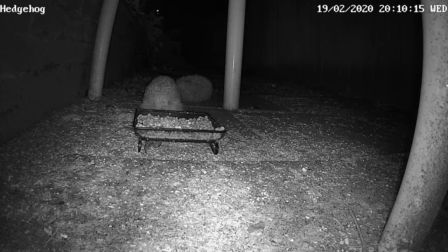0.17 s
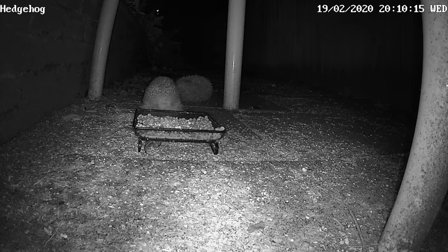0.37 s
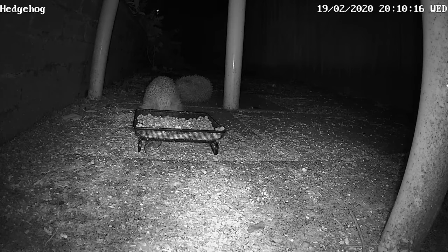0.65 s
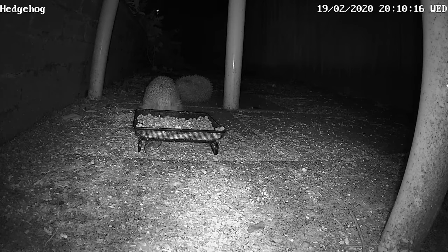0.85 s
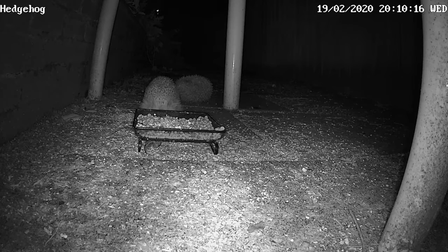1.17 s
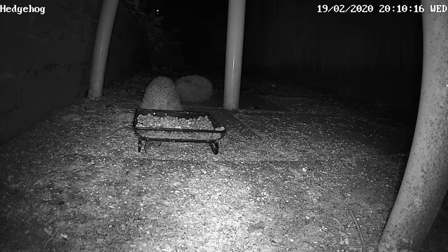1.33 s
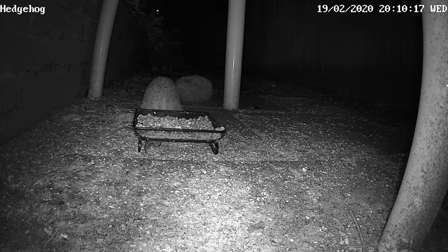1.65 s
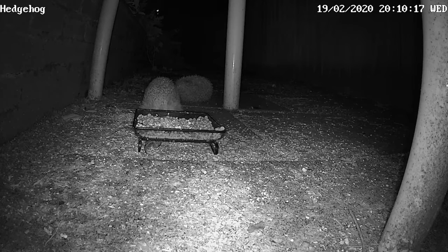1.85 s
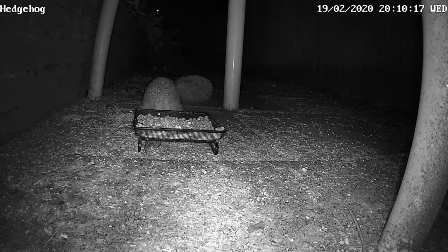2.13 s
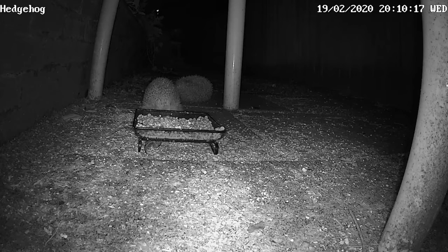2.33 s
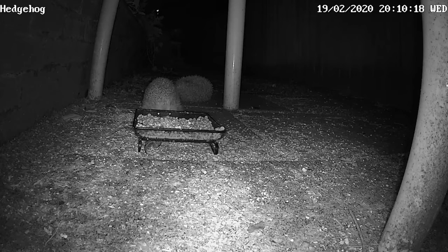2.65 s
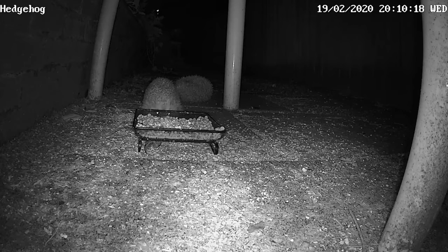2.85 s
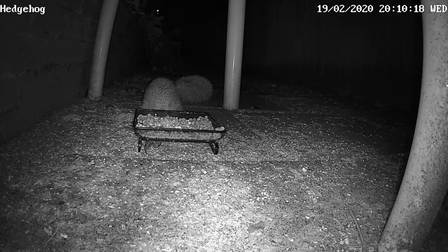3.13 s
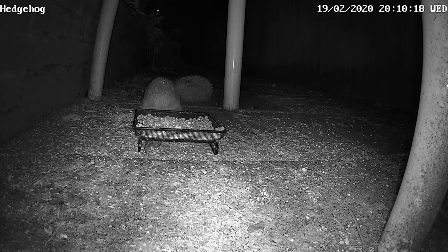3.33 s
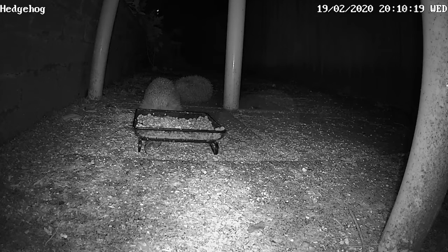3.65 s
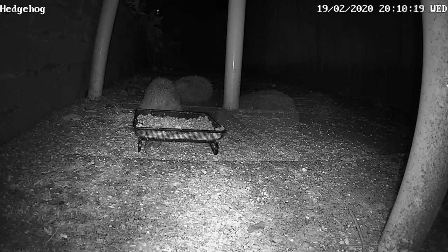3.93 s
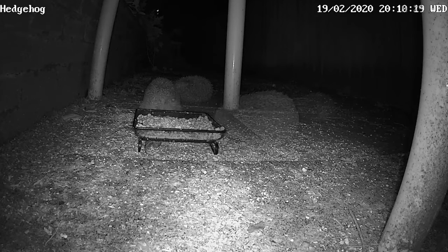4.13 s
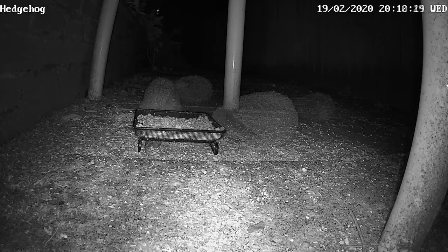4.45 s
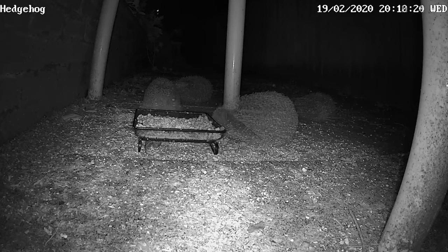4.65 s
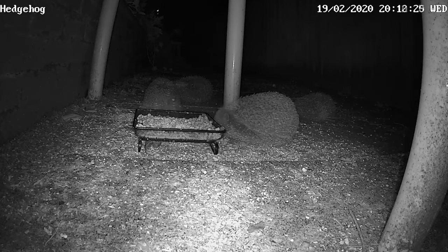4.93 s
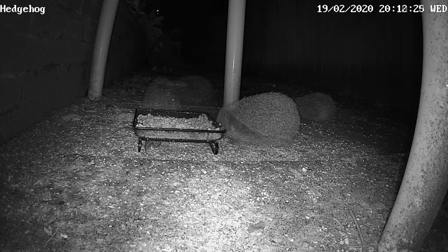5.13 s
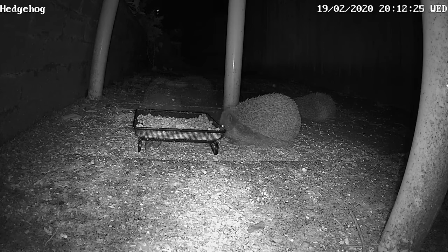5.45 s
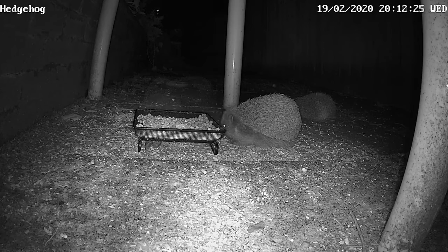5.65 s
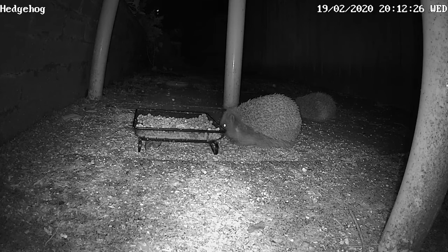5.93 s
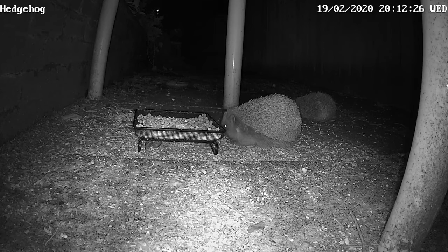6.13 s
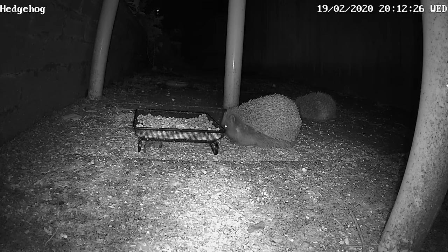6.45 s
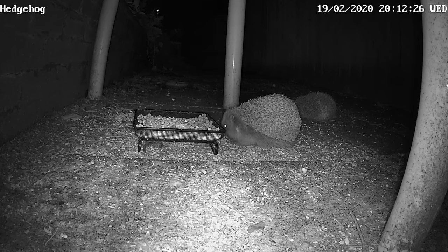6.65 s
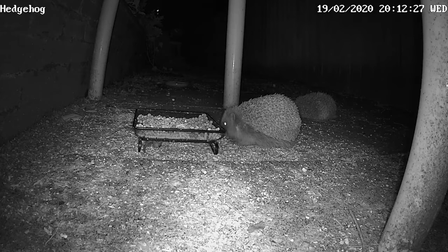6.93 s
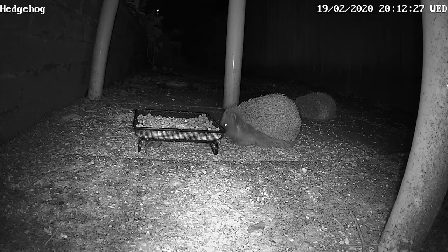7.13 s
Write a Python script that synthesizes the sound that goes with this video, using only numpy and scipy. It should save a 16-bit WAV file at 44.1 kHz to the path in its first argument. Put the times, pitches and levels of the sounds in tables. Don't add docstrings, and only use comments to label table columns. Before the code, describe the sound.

A low, muffled bed of distant road noise and engine hum runs throughout. Over it, small animals snap dry pellets, with faint gritty grinding and a hollow tray knock, echoing briefly off close walls. The first half is sparse; after a gradual blend the chewing becomes dense and quick while soft gusts bump the microphone. Cheap camera sound, lo-fi and slightly watery in the highs.

```python
import sys
import numpy as np
from scipy import signal
from scipy.fft import rfft, irfft, next_fast_len
from scipy.io import wavfile
from scipy.ndimage import uniform_filter1d

SR = 44100
rng = np.random.default_rng(int(sys.argv[2]) if len(sys.argv) > 2 else 0)


def magnitude_from_level(level_db):
    exponent = np.asarray(level_db, float) / 20
    return 10 ** exponent


def inscribe(sig):
    pcm = np.round(np.clip(np.atleast_2d(sig).T, -1, 1) * 32767)
    wavfile.write(sys.argv[1], SR, pcm.astype(np.int16))


N = 321076

# f/Hz, density/dB
WIND_COLOUR = [(5, -3), (12, 1.5), (24, -1), (36, -5), (60, -16.5), (200, -67)]
# f/Hz, density/dB
HISS_COLOUR = [(60, 3.5), (110, -1.5), (200, -5), (335, -12.5), (840, -15.5), (950, -15), (1150, -17.5),
               (1500, -25.5), (2000, -34.5), (2600, -43.5), (3300, -52.5), (8000, -70.5)]
# f/Hz, density/dB
RUMBLE_COLOUR = [(20, -16), (40, -10), (70, 10.5), (100, 4.5), (140, -4.5), (250, -39)]
# t/s, level/dB
WIND_LEVEL = [(0.0, -55), (0.47, -64), (4.24, -64), (4.48, -54.5), (4.7, -59), (5.33, -53), (7.28, -51.5)]
# t/s, level/dB
ENGINE_LEVEL = [(0.0, -70.5), (0.12, -54), (0.38, -48.5), (0.4, -64), (0.67, -49), (2.72, -54), (2.76, -50),
                (4.28, -51.5), (4.34, -46), (5.07, -58.5), (5.09, -51.5), (6.18, -55), (6.26, -38.5),
                (6.39, -56.5), (6.87, -45.5), (7.02, -55), (7.06, -41), (7.28, -60.5)]
# t/s, peak/dB
THUMPS = [(4.366, -31), (4.691, -41.5), (5.208, -39), (5.329, -33.5), (5.779, -36), (5.815, -36),
          (5.849, -38), (6.191, -33.5), (6.251, -25), (6.338, -36.5), (6.769, -39.5), (7.056, -35.5)]
# start/s, end/s, level/dB
GRINDING_BOUTS = [(0.046, 0.162, -90.5), (0.37, 0.494, -87.5), (0.563, .98, -88.5), (1.11, 1.172, -91.5),
                  (1.4, 1.596, -92), (1.826, 1.883, -88.5), (1.962, 2.089, -92), (2.405, 2.839, -87.5),
                  (3.73, 3.86, -90.5), (4.0, 4.42, -91), (4.607, 4.701, -83), (4.72, 5.026, -88.5),
                  (5.04, 5.269, -91.5), (5.4, 5.578, -90), (5.878, 6.016, -84), (6.169, 6.209, -87),
                  (6.27, 6.331, -79), (6.364, 6.56, -83)]
# f/Hz, width/Hz, level/dB
CRUMB_MODES = [(2794, 1000, 2.5), (3800, 350, -2.5), (4673, 1900, -10.5), (6400, 330, -12)]
# t/s, peak/dB, jaw f/Hz
NIBBLES = [(0.127, -78, 3120), (0.5562, -75.5, 3220), (1.1307, -72.5, 3270), (1.41, -80, 3120),
           (2.316, -81, 3830), (2.342, -69.5, 4020), (2.5424, -71, 3740), (4.0148, -61, 3350),
           (4.0312, -65.5, 3430), (4.0428, -64, 3320), (4.0993, -72, 3800), (4.105, -73.5, 3910),
           (4.203, -64.5, 3720), (4.2305, -61.5, 3658), (4.4179, -72, 3940), (4.698, -86, 3300),
           (4.731, -75, 3900), (4.846, -64, 3600), (5.076, -73, 4280), (5.119, -75, 3630),
           (5.1404, -73, 3400), (5.886, -55, 3700), (6.1567, -62, 3410), (6.1703, -61, 3640),
           (6.207, -57, 3610), (6.533, -61, 3610), (6.6111, -61.5, 3720), (6.625, -56, 3910),
           (6.938, -65, 3730), (7.199, -65, 3530)]
# t/s, peak/dB, tray thud/dB rel, bright snap/dB rel, jaw f/Hz
BREAKS = [(0.3379, -50, -1.5, -27, 3850), (0.7087, -47.5, -13.5, -24, 4100), (0.846, -48.5, 1, -24, 3700),
          (1.3581, -37, -7, -15.5, 4070), (1.654, -42, 9, 5.5, 5100), (2.7293, -53.5, 1, -14, 3930),
          (3.0993, -32, -5, 8.5, 4110), (3.1129, -35, -8.5, -14, 5050), (3.268, -44, -4.5, 5, 3820),
          (3.2971, -39, -10, -17, 3890), (3.7232, -43.5, -16, -8, 3730), (4.4928, -45, -22, 0, 3860),
          (4.571, -42, 6, -28, 4160), (4.61, -36, -3, -2.5, 4020), (4.801, -45, -23, 3, 3980),
          (4.8304, -44.5, -28, -6, 3880), (5.4663, -49.5, -28, -9, 4290), (5.6707, -32.5, -1, -9.5, 4330),
          (5.737, -39, 2.5, -10.5, 4390), (5.918, -46, 3.5, -24, 4110), (6.2672, -39.5, -0.5, -6, 4060),
          (6.3943, -38, -5.5, -13, 4060), (6.6367, -42, -22.5, -14, 3920), (6.9137, -45, -20.5, -29, 3490)]
# t/s, peak/dB, bright snap/dB rel, jaw f/Hz
CHEWS = [(0.656, -54.5, -8, 3720), (0.83, -54, -35, 4030), (1.5377, -53.5, -10, 4320),
         (2.0098, -56, -22, 4060), (2.7561, -51.5, -11, 3750), (3.254, -48.5, -30, 3970),
         (3.691, -55.5, -6.5, 3970), (3.7049, -48.5, -20, 3660), (4.4532, -55, -8.5, 3830),
         (4.5796, -44, -8, 4100), (4.779, -51, -15, 3700), (4.877, -49, -23, 3520),
         (5.0853, -58, -0.5, 3770), (5.107, -51.5, -2.5, 4000), (5.1895, -54.5, 0, 3760),
         (5.4107, -63, -15, 3840), (5.683, -41, -7, 3130), (5.9373, -46, -11, 3630),
         (5.9616, -39.5, -17, 3700), (5.9688, -43.5, -20, 3690), (6.011, -49.5, -24, 3300),
         (6.1867, -43.5, -28, 3410), (6.3784, -55, -4, 4660), (6.4452, -46, -15, 4060),
         (6.4624, -48, -15, 4490), (6.6575, -43.5, -18, 3640), (5.515, -70, -18, 4070),
         (5.555, -62, -20, 3553)]
# f/Hz, width/Hz, level/dB
TRAY_MODES = [(944, 190, -2), (1294, 230, 0), (2600, 1700, 1.5)]
# f/Hz, width/Hz, level/dB
SNAP_MODES = [(5890, 1300, 0.5), (7460, 2200, 2), (7300, 1100, -13)]
# delay t/s, level/dB
ECHOES = [(.0032, -12), (.0075, -16.5), (0.012, -14), (.019, -23.5)]
ATTACKS_S = [1.357, 1.653, 3.09, 3.11, 4.452, 4.492, 4.571, 4.61, 5.40, 5.466, 5.67, 6.266, 6.393]

DISSOLVE_S = (4, 5.2)
HUM_HZ = (48.5, 60.3)
RUMBLE_DB, HISS_DB = (-59.5, -59.5), (-55, -55.5)
GATE_DB = (-80.5, -75)
FRAME_GRID = (964, 835)

CAMERA_SR, FRAME, BRIEF = 16000, 1024, 128
FRAME_BANDS = np.r_[0:88:8, 88:196:12, np.geomspace(196, FRAME, 24).round()].astype(int)
BRIEF_BANDS = np.r_[0:32:4, 32, 40, 48, 60, 72, 88, 104, 116, 128]


def level_over_time(rows):
    s, level_db = np.transpose(rows)
    return np.interp(np.arange(N) / SR, s, level_db)


def rms_one(x):
    return x / np.sqrt(np.mean(x ** 2) + 1e-20)


def coloured(spectrum):
    size = next_fast_len(N)
    hz, level_db = np.transpose(spectrum)
    bins_hz = np.arange(size // 2 + 1) * SR / size
    shape = magnitude_from_level(np.interp(np.log(bins_hz + 1), np.log(hz), level_db))
    return rms_one(irfft(rfft(rng.standard_normal(size)) * shape, size)[:N])


def resonate(x, hz, width_hz):
    r, w = np.exp(-np.pi * width_hz / SR), 2 * np.pi * hz / SR
    return signal.lfilter([0, np.sin(w)], [1, -2 * r * np.cos(w), r * r], x)


def body(x, modes):
    return sum((-1) ** k * magnitude_from_level(db) * resonate(x, hz, width) for k, (hz, width, db) in enumerate(modes))


def later_share():
    return np.interp(np.arange(N) / SR, DISSOLVE_S, [0, 1])


def dissolve_dip_db():
    return -1.5 * np.sin(np.pi * later_share())


def engine(wander_hz=1.2):
    share = later_share()
    wander = np.cumsum(wander_hz * coloured([(.1, 0), (3, 0), (30, -40)])) / SR
    turns = np.outer(HUM_HZ, np.arange(N) / SR) + wander
    early, late = np.sqrt(2) * np.sin(2 * np.pi * turns)
    return magnitude_from_level(level_over_time(ENGINE_LEVEL) - 0.5) * ((1 - share) * early + share * magnitude_from_level(-1.5) * late)


def traffic(swell_db=1.5, rumble_rise_db_per_s=3, hiss_rise_db_per_s=1.75):
    share, dip_db = later_share(), dissolve_dip_db()
    nearing_s = np.clip(np.arange(N) / SR - DISSOLVE_S[1], 0, 1.4)
    swell = swell_db * coloured([(.1, 0), (3, 0), (300, -120)])
    rumble_db = np.interp(share, [0, 1], RUMBLE_DB) + dip_db + swell + rumble_rise_db_per_s * nearing_s
    hiss_db = np.interp(share, [0, 1], HISS_DB) + dip_db + hiss_rise_db_per_s * nearing_s
    return magnitude_from_level(rumble_db) * coloured(RUMBLE_COLOUR) + magnitude_from_level(hiss_db) * coloured(HISS_COLOUR)


def wind():
    return magnitude_from_level(level_over_time(WIND_LEVEL) + 3.5) * coloured(WIND_COLOUR)


def thumps(swing_hz=31.7, turns=.65, gain_db=-1.0):
    out, t = np.zeros(N + SR), np.arange(SR // 4) / SR
    age = t * swing_hz / turns
    swing = np.e * age * np.exp(-2 * age) * 2 * np.sin(2 * np.pi * swing_hz * t)
    for s, peak_db in THUMPS:
        at = round(s * SR)
        out[at:at + len(t)] += magnitude_from_level(peak_db + gain_db) * swing
    return out[:N]


def grinding(clicks_per_s=1500, fade_db_per_s=500, gain_db=-0.5):
    sizes = magnitude_from_level(3.5 * np.minimum(rng.exponential(1, N), 4)) * rng.choice([-1, 1], N)
    clicks = sizes * (rng.random(N) < clicks_per_s / SR)
    t = np.arange(N) / SR
    effort = np.zeros(N)
    for start, end, level_db in GRINDING_BOUTS:
        outside_s = np.maximum(0, np.maximum(start - t, t - end))
        effort += magnitude_from_level(level_db - fade_db_per_s * outside_s)
    return effort * magnitude_from_level(gain_db) * rms_one(body(clicks, CRUMB_MODES))


def nibbles(width_hz=1000, length_s=0.0072, gain_db=-2.5, echo_s=0.003, echo_db=-3.0):
    out, t = np.zeros(N + SR), np.arange(SR // 10) / SR
    age = t / length_s
    for s, peak_db, jaw_hz in NIBBLES:
        rasp = rng.standard_normal(len(t))
        for _ in range(2):
            rasp = resonate(rasp, jaw_hz, width_hz)
        rasp = rms_one(rasp) * np.sqrt(age) * np.exp(-age)
        rasp = rasp + magnitude_from_level(echo_db) * np.roll(rasp, round(echo_s * SR))
        at = round(s * SR)
        out[at:at + len(t)] += magnitude_from_level(peak_db + gain_db) * rasp
    return out[:N]


def crack_force(t, t60_s, splinter_db=-11, tail_db=-26):
    draw, scatter = rng.random(len(t)), rng.standard_normal((2, len(t)))
    force = magnitude_from_level(splinter_db) * scatter[0] * (draw < 900 / SR) * np.exp(-t / 0.0066)
    force[0] = 1
    force = force + sum(magnitude_from_level(db) * np.roll(force, round(lag * SR)) for lag, db in ECHOES)
    tail = scatter[1] * magnitude_from_level(-60 * t / t60_s) * (1 - np.exp(-t / 0.0024))
    return force + magnitude_from_level(tail_db) * tail


def cracks(break_t60_s=0.082, chew_t60_s=0.099, chew_thud_db=-5.5, jaw_width_hz=520, thud_db=-3, gain_db=-2):
    out, t = np.zeros(N + SR), np.arange(SR // 5) / SR
    breaks = [(*row, break_t60_s) for row in BREAKS]
    chews = [(s, db, chew_thud_db, snap, hz, chew_t60_s) for s, db, snap, hz in CHEWS]
    for s, peak_db, tray_db, snap_db, jaw_hz, t60_s in breaks + chews:
        force = crack_force(t, t60_s)
        sound = resonate(force, jaw_hz, jaw_width_hz)
        sound += magnitude_from_level(snap_db) * body(force, SNAP_MODES)
        sound += magnitude_from_level(tray_db + thud_db) * body(force, TRAY_MODES)
        at = round(s * SR)
        out[at:at + len(t)] += magnitude_from_level(peak_db + gain_db) * sound
    return out[:N]


def scene():
    background = engine() + traffic() + wind() + thumps()
    eating = grinding() + nibbles() + cracks()
    return (background + eating)[None]


def coarse_bands(x, size, window, bands, gate_db, step_db, treble_db=3.0, mask_db=-17, coarse_db=8):
    n, width = np.arange(2 * size), np.diff(bands)
    basis = np.cos(np.pi / size * np.outer(n + .5 + size / 2, n[:size] + .5))
    basis = basis * np.sqrt(2 / size) * window[:, None]
    halves = x.reshape(-1, size)
    lines = np.hstack([halves[:-1], halves[1:]]) @ basis
    level = np.sqrt(np.add.reduceat(lines ** 2, bands[:-1], axis=1) / width) + 1e-12
    gate = magnitude_from_level(gate_db[size::size, None] + treble_db * bands[:-1] / size)
    high = bands[:-1] > size // 4
    loudest = (level * high).max(axis=1)[:, None]
    gate = np.maximum(gate, magnitude_from_level(mask_db) * high * loudest)
    step = np.repeat(np.maximum(level * magnitude_from_level(step_db), gate * magnitude_from_level(coarse_db)), width, axis=1)
    kept = np.repeat(level > gate, width, axis=1)
    back = (np.round(lines / step) * step * kept) @ basis.T
    silent = halves[:1] * 0
    return (np.vstack([back[:, :size], silent]) + np.vstack([silent, back[:, size:]])).ravel()


def camera_storage(x, gate_db, grid, step_db=-8.0, brief_step_db=-13.5):
    front = 2 * FRAME - grid
    back = FRAME + -(front + len(x)) % FRAME
    padded, gate_db = np.pad(x, (front, back), "reflect"), np.pad(gate_db, (front, back), "edge")
    attack = np.zeros(len(padded) // FRAME)
    attack[((np.array(ATTACKS_S) * CAMERA_SR + front - FRAME / 2) // FRAME).astype(int)] = 1
    brief = uniform_filter1d(np.roll(np.repeat(attack, FRAME), FRAME // 2), size=BRIEF)
    kaiser = np.kaiser(FRAME + 1, 4 * np.pi)
    rise = np.sqrt(np.cumsum(kaiser)[:-1] / kaiser.sum())
    sine = np.sin(np.pi * (np.arange(2 * BRIEF) + .5) / (2 * BRIEF))
    no_bass = signal.butter(2, 600, "high", fs=CAMERA_SR, output="sos")
    sharp = brief * signal.sosfiltfilt(no_bass, padded)
    stored = coarse_bands(padded - sharp, FRAME, np.r_[rise, rise[::-1]], FRAME_BANDS, gate_db, step_db)
    stored += coarse_bands(sharp, BRIEF, sine, BRIEF_BANDS, gate_db, brief_step_db)
    return stored[front:front + len(x)]


def roll_off(x):
    return signal.sosfilt(signal.butter(12, 7890, fs=SR, output="sos"), x)


def record(dry):
    soft = signal.sosfilt(signal.butter(8, 7150, fs=SR, output="sos"), dry[0])
    slow = signal.resample_poly(soft, 160, 441)
    since_s = np.arange(len(slow)) / CAMERA_SR - DISSOLVE_S[1]
    early_gate_db = GATE_DB[0] + 0 * since_s
    late_gate_db = GATE_DB[1] + 1 * since_s - 5.5 * np.exp(-np.abs(since_s) / .3)
    moments = []
    for gate_db, grid in zip((early_gate_db, late_gate_db), FRAME_GRID):
        stored = camera_storage(slow, gate_db, grid)
        moments.append(signal.resample_poly(stored, 441, 160, window=("kaiser", 10))[:N])
    early, late = moments
    mix = (1 - later_share()) * early + later_share() * late + .0005
    return roll_off(mix[None])


dry = scene()
out = record(dry)
inscribe(out)
```